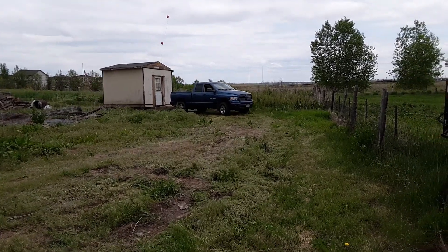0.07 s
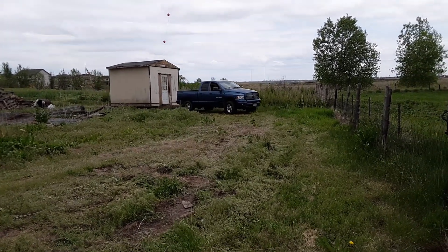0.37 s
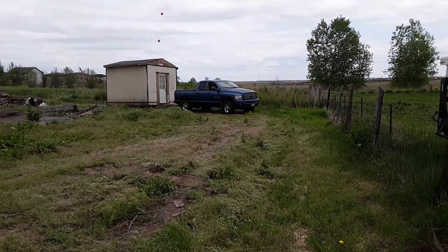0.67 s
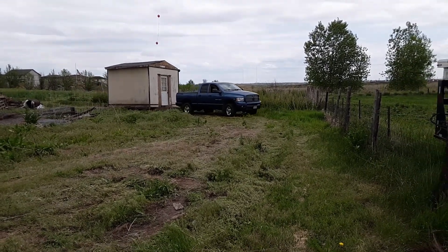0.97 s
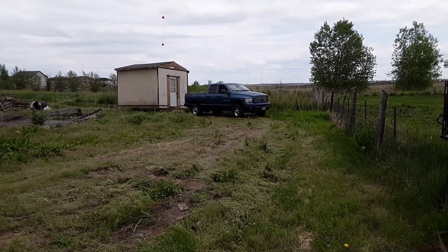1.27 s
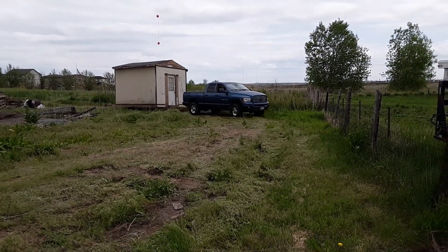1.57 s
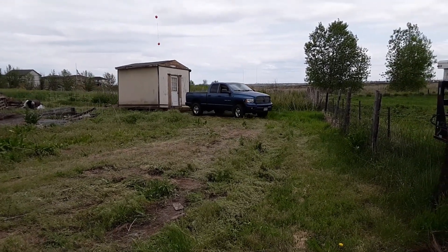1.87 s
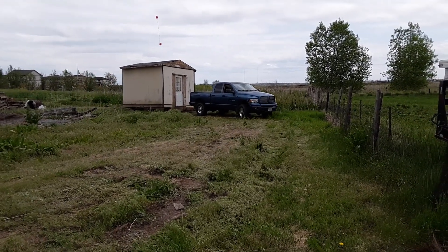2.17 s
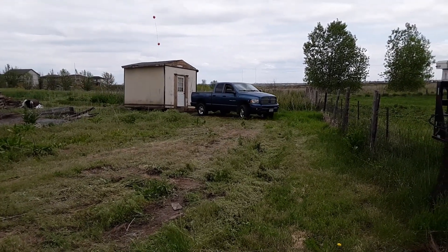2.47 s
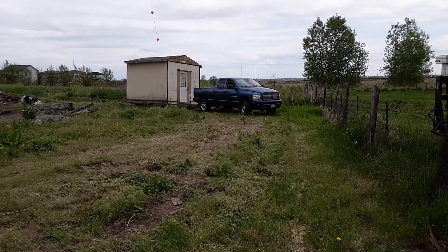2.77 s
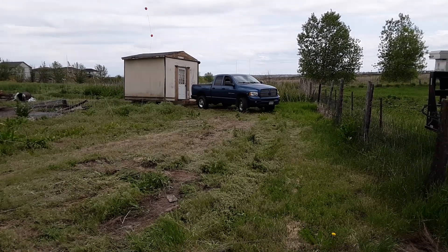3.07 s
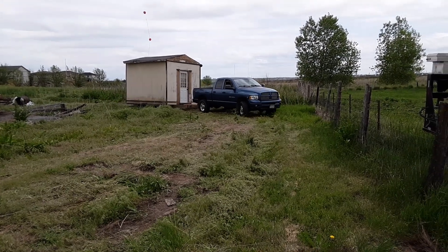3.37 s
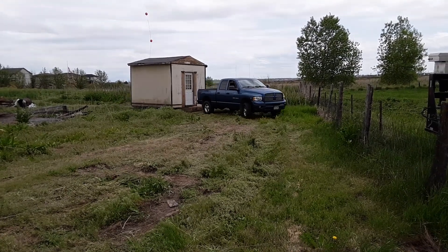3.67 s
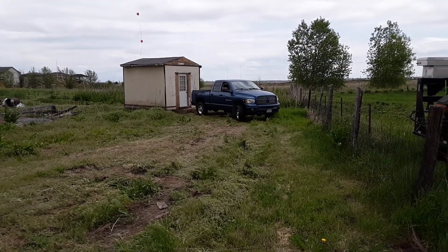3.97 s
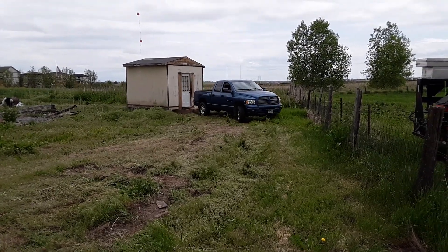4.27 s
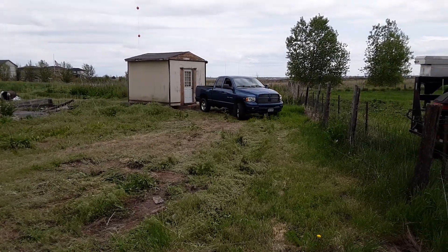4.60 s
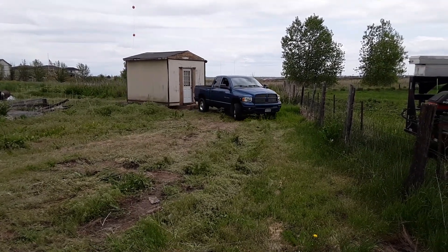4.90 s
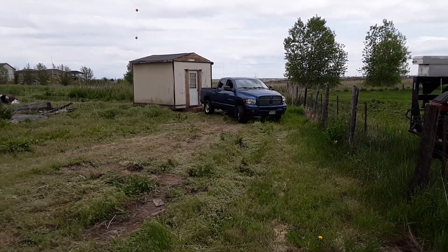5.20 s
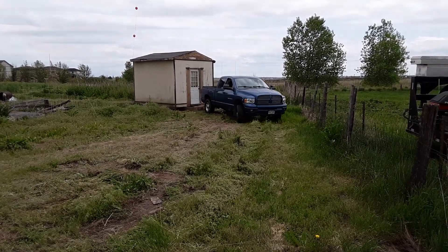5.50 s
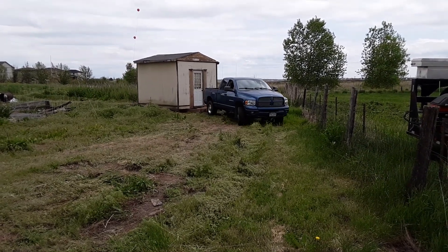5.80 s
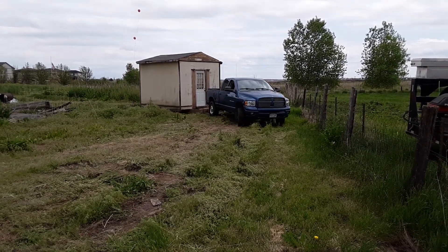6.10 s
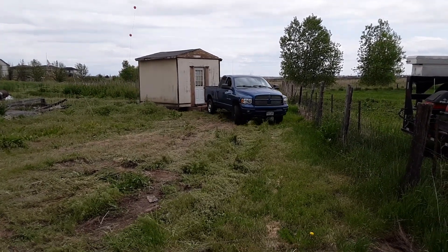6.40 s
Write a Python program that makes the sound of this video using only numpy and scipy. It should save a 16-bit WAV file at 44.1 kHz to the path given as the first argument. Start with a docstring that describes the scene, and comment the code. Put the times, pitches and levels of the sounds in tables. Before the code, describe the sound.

Outdoors, a diesel truck pulls a heavy load at low revs, with a continuous knocking clatter, a deep hum and thin belt squeaks. Quiet footsteps brush through grass and crack a few stems near the microphone. Dull wind buffets come and go, mostly on the muffled right channel. In the second half the engine slows and its boom thins, before swelling again for one last pull.

```python
"""A six-cylinder diesel pickup crawls over a field, dragging a shed: its cylinders clatter unevenly and
its exhaust booms as the load shifts the revs. Close by, feet swish through grass, stalks snap and wind
buffets the microphone. From 1.2 s the truck pulls into the open, its belt chirps and an insect ticks in
faint bouts. The hardest buffets hit near 4.3 s; the revs sag and the boom thins, until the exhaust
growls on a last pull at 6 s. The right microphone port is muffled throughout."""
import sys
import numpy as np
from scipy import signal
from scipy.fft import rfft, irfft
from scipy.io import wavfile
from scipy.ndimage import uniform_filter1d

SR = 44100
rng = np.random.default_rng(int(sys.argv[2]) if len(sys.argv) > 2 else 0)


def materialize(psi):
    """Save the field psi as 16-bit PCM at rate SR to the path in sys.argv[1].

    A 1-D psi becomes a single channel; in a 2-D psi each row is a channel.
    """
    bounded = np.clip(np.atleast_2d(psi).T, -1, 1)
    quanta = np.round(bounded * 32767).astype(np.int16)
    wavfile.write(sys.argv[1], SR, quanta)


N = 293265
TIME = np.arange(N) / SR
FREQS = np.fft.rfftfreq(N, 1 / SR)
CYLINDERS, CRUISE_HZ = 6, 55  # firings per engine cycle; firings per second at cruise


def amp(db):
    """Decibels to gain."""
    return 10 ** (np.asarray(db) / 20)


def unit(x):
    """Scales to rms 1."""
    return x / np.sqrt(np.mean(x ** 2) + 1e-20)


def curve(points):
    """An automation curve through (time_s, value) points."""
    return np.interp(TIME, *np.transpose(points))


def colour(points):
    """An EQ curve through (freq_hz, gain_db) points."""
    hz, db = np.transpose(points)
    return amp(np.interp(np.log(FREQS + 1), np.log(hz + 1), db))


def noise(gain):
    """Noise of rms 1 with the given spectrum."""
    return unit(irfft(rfft(rng.standard_normal(N)) * gain, N))


def drift(hz):
    """A random wobble of rms 1, up to about hz."""
    return noise(1 / (1 + (FREQS / hz) ** 4))


def add(mix, s, sound):
    """Mixes a sound in from time s."""
    part = mix[max(round(s * SR), 0):][:len(sound)]
    part += sound[:len(part)]


def chirps(rows, length_s, glide, rasp, gain_db=0):
    """Short rough whistles that rise by the share glide, from rows of time_s, level_db, pitch_hz."""
    out, t = np.zeros(N), np.arange(0, length_s, 1 / SR)
    for s, db, hz in rows:
        jitter = unit(uniform_filter1d(rng.standard_normal(len(t)), size=30))
        pitch = hz * (1 + glide * (t / length_s - .5) + rasp * jitter)
        whistle = np.sin(2 * np.pi * np.cumsum(pitch) / SR)
        add(out, s - length_s / 4, amp(db + gain_db) * np.hanning(len(t)) * whistle)
    return out


def puffs(rows, octaves, gain_db, size=16384):
    """Brief swells of band noise, from rows of time_s, level_db, half_length_s, centre_hz."""
    out, t, f = np.zeros(N), (np.arange(size) - size / 2) / SR, np.fft.rfftfreq(size, 1 / SR)
    for s, db, half_s, hz in rows:
        band = (1 + (np.log2((f + 1) / hz) / octaves) ** 2 / 6) ** -3
        swell = np.exp(-.5 * (t / half_s) ** 2)
        puff = swell * irfft(rfft(rng.standard_normal(size)) * band)
        puff *= np.linalg.norm(swell) / np.linalg.norm(puff)
        add(out, s - size / 2 / SR, amp(db + gain_db) * puff)
    return out


def air(level_db=-69):
    """A faint, bright bed of open-air hiss."""
    # hiss colour: freq_hz, gain_db
    hiss_eq = [(500, -5.5), (7000, -7), (8500, 3.5), (9700, 3), (10500, -0.5), (13000, -9.5),
               (16000, -10.5)]
    return amp(level_db) * noise(colour(hiss_eq))


def insect(gap_s=0.2875, pitch_hz=9300, level_db=-61.5, scatter_db=5):
    """An insect gives thin, evenly spaced ticks in short bouts."""
    # bouts of ticking: start_s, end_s
    bouts = [(1.26, 1.4), (3.655, 4.1), (5.095, 6.4)]
    times = np.concatenate([np.arange(start, end, gap_s) for start, end in bouts])
    ticks = [(s, rng.normal(level_db, scatter_db), pitch_hz * rng.normal(1, .012)) for s in times]
    return chirps(ticks, length_s=.035, glide=0.036, rasp=0.024)


def grass(stir_db=-87, gain_db=7, grain_db=3, crackles_per_s=80):
    """Blades brush in a clumped fizz with dry crackles, swelling over a faint stir as each foot sweeps."""
    # rustle colour: freq_hz, gain_db
    rustle_eq = [(2000, -22.5), (5000, -11), (8000, -9.5), (10500, -1.5), (13000, -.5), (15500, -3.5)]
    # foot sweeps: peak_s, relative_db, length_s
    swishes = [(0.071, -57.5, .06), (0.227, -61.5, 0.11), (0.457, -54.5, 0.09), (1.0, -65, 0.13),
               (1.16, -65, 0.24), (1.621, -56, .16), (1.852, -57.5, .22), (2.08, -60, .13),
               (2.537, -54.5, .14), (2.797, -68, 0.19), (3.25, -58, 0.25), (3.503, -63.5, 0.12),
               (4.15, -74.5, .3), (4.449, -59.5, 0.12), (4.74, -60, .17), (5.0, -75, .2),
               (5.45, -71.5, 0.12)]
    power = amp(stir_db) ** 2
    for s, db, length in swishes:
        age = (TIME - s) / length
        swell = np.exp(-np.maximum(-age / 0.55, age / 0.63) ** 1.1)  # pointed top, slightly slower fall
        power += (amp(db) * swell) ** 2
    fizz = unit(rng.standard_normal(N) * amp(grain_db * drift(900)))
    onsets = rng.random(N) < crackles_per_s / SR
    crackles = onsets * amp(14 + 5 * np.minimum(rng.exponential(1, N), 3))
    rustle = unit(irfft(rfft(fizz + crackles) * colour(rustle_eq), N))
    return amp(gain_db) * np.sqrt(power) * rustle


def crunches(centre_hz=4700):
    """Dry stems crush underfoot in narrow puffs of noise."""
    # crushed stems: time_s, relative_db, half_length_s
    stems = [(.205, -41.5, 0.0074), (1.613, -41.5, 0.0055), (1.679, -49.5, 0.11), (3.135, -42, 0.016),
             (3.233, -48, 0.062)]
    return puffs([(*row, centre_hz) for row in stems], octaves=0.21, gain_db=-1.5)


def snaps(decay_s=0.00069, octaves=0.61, gain_db=0.5, size=1024):
    """A dry stalk breaks with one sharp crack and a millisecond of splintering."""
    # breaking stalks: time_s, relative_db, centre_hz
    stalks = [(.197, -25, 13000), (.207, -21.5, 10000), (0.282, -31, 8000), (1.576, -25.5, 13100),
              (1.6142, -16, 2700), (1.6148, -24.5, 9550), (1.725, -24, 12000), (1.799, -21.5, 12950),
              (1.8496, -8.5, 14500), (2.476, -23, 13000), (2.611, -28, 11000), (3.238, -16, 14000),
              (4.46, -29, 12900), (4.738, -27, 14000)]
    out, t, f = np.zeros(N), np.arange(size) / SR, np.fft.rfftfreq(2 * size, 1 / SR)
    for s, db, hz in stalks:
        splinters = 0.18 * rng.standard_normal(size) * np.exp(-t / decay_s)
        burst = np.pad((t == 0) + splinters, (size, 0))
        band = np.exp(-.5 * (np.log2((f + 1) / hz) / octaves) ** 2)
        crack = irfft(rfft(burst) * band)
        add(out, s - size / SR, amp(db + gain_db) * crack / abs(crack).max())
    return out


def buffets(gap_s=0.35, eddy_hz=189):
    """Eddies strike a port as dull thuds of a few cycles: a few strong ones, and small ones at random."""
    # strong eddies: time_s, relative_db, half_length_s, centre_hz
    strong = [(0.669, -26.5, 0.018, 183), (0.746, -22.5, 0.034, 160), (.812, -30, 0.0073, 320),
              (0.82, -24.5, 0.06, 176), (.935, -30.5, 0.0092, 270), (0.988, -25, 0.01, 181),
              (1.553, -28, 0.013, 166), (2.39, -28.5, 0.019, 196), (2.502, -28, 0.012, 170),
              (2.62, -27, 0.016, 200), (2.79, -24.5, 0.0095, 240), (4.262, -21, 0.021, 170),
              (4.337, -18, 0.015, 260), (4.423, -19.5, 0.016, 218), (4.716, -27.5, 0.021, 163),
              (5.341, -29, 0.014, 158)]
    small = [((k + .5 + .5 * late) * gap_s, -36.5 + 4 * strength, 0.017, eddy_hz)
             for k, (late, strength) in enumerate(rng.uniform(-1, 1, size=(24, 2)))]
    return puffs(strong + small, octaves=0.4, gain_db=-0.8)


def wind(breeze_db, lumps_db=4.5, rumble_db=-58):
    """Lumpy turbulence over a deep rumble at one microphone port."""
    # turbulence colour: freq_hz, gain_db
    breeze_eq = [(20, -21), (40, -6.5), (75, 4), (130, 0), (220, -5.5), (320, -11), (500, -25), (900, -38),
                 (2000, -58)]
    rumble = noise(colour([(15, -18), (30, -6.5), (45, -6), (90, -11.5), (300, -63)]))
    turbulence = unit(noise(colour(breeze_eq)) * amp(lumps_db * drift(15)))
    return amp(rumble_db) * rumble + amp(breeze_db) * turbulence


def ride(rate, gain_db, db_per_hz, near_share):
    """The fader of one engine part: it rides the firing rate and the truck's nearness."""
    # the truck pulls into the open: time_s, gain_db
    nearness = [(0.0, -2.5), (1.15, -2.5), (1.6, -0.86), (2.5, 0.1), (6.65, 0.5)]
    return amp(gain_db + db_per_hz * (rate - CRUISE_HZ) + near_share * curve(nearness))


def on_crank(firings, every, offset, db, scatter_db, hz, spread):
    """Rows of time_s, level_db, pitch_hz for a sound that returns every few firings."""
    times = TIME[1:][np.diff((firings + offset) // every) > 0]
    accent, detune = rng.standard_normal((len(times), 2)).T
    return np.transpose([times, db + scatter_db * accent, hz * (1 + spread * detune)])


def belt(firings, rate, pitch_hz=3190, pitch_per_rate=32):
    """The belt squeaks faintly once a cycle; its occasional louder chirps are higher at higher revs."""
    # louder chirps: time_s, relative_db
    accents = [(1.537, -43), (1.743, -37.5), (2.05, -38.5), (2.4668, -46), (3.745, -44.5), (4.5226, -46),
               (4.8662, -42)]
    squeaks = on_crank(firings, every=CYLINDERS, offset=0.98, db=-47.5, scatter_db=1, hz=3175,
                       spread=0.045)
    pitch = pitch_hz + pitch_per_rate * (rate - CRUISE_HZ)
    loud = [(s, db, np.interp(s, TIME, pitch)) for s, db in accents]
    return chirps([*squeaks, *loud], length_s=.016, glide=0.083, rasp=0.019, gain_db=6.5)


def crank_ticks(firings, rate):
    """A bright metal tick at each turn of the crank."""
    ticks = on_crank(firings, every=3, offset=1.8, db=-36.5, scatter_db=2, hz=2180, spread=.04)
    fader = ride(rate, 0.5, db_per_hz=0.3, near_share=1.7)
    return fader * chirps(ticks, length_s=.009, glide=0, rasp=.03)


def knocking(firings, rise_s=0.0021, ring_s=0.0042, scatter_db=0.9, gears=0.35, valve=0.55):
    """Force on the block: each firing knocks and a valve shuts midway to the next, over steady gears."""
    # each cylinder's knock, in firing order: relative_db
    knocks = [-8, -3, -3, -14, -3.5, -8.5]
    count = firings.astype(int)
    strength = amp(np.array(knocks)[count % CYLINDERS] + scatter_db * rng.standard_normal(1000)[count])
    since_s = (np.array([firings, firings + .5]) % 1) / np.gradient(firings) / SR
    knock, tap = np.exp(-since_s / ring_s) * (1 - np.exp(-since_s / rise_s))
    return np.sqrt(gears + strength ** 2 * (2 * knock + valve * tap))


def sheet_ring(force, rate):
    """A close pair of sheet-metal modes, kept singing by the knocks."""
    modes = [(1225.7, 67, -1.0), (1159, 140, -2.5)]  # pitch_hz, width_hz, gain_db
    response = sum(amp(db) / (1 + 2j * (FREQS - hz) / width) ** 2 for hz, width, db in modes)
    ring = unit(irfft(rfft(force ** 2 * rng.standard_normal(N)) * response, N))
    return ride(rate, -46.5, db_per_hz=-0.55, near_share=1.7) * ring


def clatter(force, rate, patchy_db=1.37):
    """Knocks shake the block, each band a little differently every time; gives direct and scattered."""
    # engine block colour: freq_hz, gain_db
    block_eq = [(240, -26), (400, -4.5), (441, -6.5), (600, -9), (670, -6), (888, -5.5), (1030, -6),
                (1210, 0), (1360, -3.5), (2020, -1), (2850, -6.5), (3300, -8.5), (3590, -9.5), (5260, -12),
                (7500, -37.5), (9750, -63), (16500, -120)]
    # ringing engine panels: pitch_hz, width_hz, lift_db
    panels = [(671, 55, 4.5), (780, 19, 3.5), (1260, 200, 0), (1530, 50, 4), (1733, 23, 4.5),
              (1930, 100, 2), (3050, 90, -0.5), (5400, 540, 0)]
    lift_db = sum(db / (1 + (2 * (FREQS - hz) / width) ** 2) for hz, width, db in panels)
    body = colour(block_eq) * amp(lift_db)
    band = np.digitize(FREQS, [1000, 1600, 2400, 3400, 4600])
    spectra = 0
    for k in np.unique(band):
        blows = force * amp(patchy_db * drift(82)) * rng.standard_normal((2, N))
        spectra += rfft(blows) * body * (band == k)
    return ride(rate, -38, db_per_hz=0.17, near_share=0.36) * unit(irfft(spectra, N))


def roar(level_db=-41):
    """A steady low roar beneath the engine's tones."""
    # roar colour: freq_hz, gain_db
    roar_eq = [(20, -17.5), (45, -6.5), (90, 11.5), (230, -1.5), (330, -4.5), (480, -8), (620, -19.5),
               (1200, -44)]
    return amp(level_db) * noise(colour(roar_eq))


def pipe(hz, centre_hz, width_hz):
    """Gain of an exhaust pipe resonance for a tone at hz."""
    return 1 / (1 + (2 * (hz - centre_hz) / width_hz) ** 2)


def partials(rows, phase, waver, waver_hz):
    """Wavering harmonics of the whole engine cycle, locked to the firing phase."""
    return sum(amp(db) * (1 + waver * drift(waver_hz))
               * np.sin(order * phase / CYLINDERS + 2 * np.pi * rng.random()) for order, db in rows)


def exhaust(firings, rate, throb=0.052, growl_gain_db=1.5):
    """Clean tones boom as the revs pass the pipe's resonances; unequal cylinders add tones between."""
    # weaker exhaust tones: cycle_multiple, level_db
    uneven_tones = [(8, -65.5), (9, -54.5), (10, -52.5), (13, -60), (14, -47.5), (15, -43), (16, -50.5),
                    (18, -46.5), (21, -62), (22, -58), (27, -58.5), (32, -53.5), (44, -66.5)]
    # growl under throttle: cycle_multiple, relative_db
    growl_tones = [(25, -13), (26, -25.5), (33, -19.5), (36, -14.5), (39, -17), (42, -24.5), (48, -16.5),
                   (51, -22.5), (54, -19.5), (60, -24.5), (78, -19), (84, -17.5)]
    # the exhaust opens up on the last pull: time_s, relative_db
    growl_swell = [(0.0, -45), (3.4, -45.5), (5.7, -47.5), (6.15, -36.5), (6.65, -40.5)]
    phase = 2 * np.pi * firings
    bass = ride(rate, -44, db_per_hz=0.7, near_share=-0.3) * np.sin(phase)
    boom = ride(rate, -20.5, db_per_hz=0.49, near_share=1) * np.sin(2 * phase)
    boom *= pipe(2 * rate, centre_hz=114.36, width_hz=9.74) * (1 + throb * drift(5.7))
    octave = ride(rate, -38.5, db_per_hz=0, near_share=1.3) * np.sin(4 * phase)
    octave *= pipe(4 * rate, centre_hz=218.5, width_hz=22.5)
    growl = partials(growl_tones, phase, waver=0.27, waver_hz=14)
    growl *= amp(curve(growl_swell) + growl_gain_db)
    uneven = partials(uneven_tones, phase, waver=0.25, waver_hz=1.6)
    return np.sqrt(2) * (bass + boom + octave + growl + uneven)


def scene(alike_hz=2800):
    """Truck and field reach the left port first; the right port hears them dulled and late."""
    # engine speed, sagging whenever the shed digs in: time_s, firing_hz
    revs = [(0.0, 57.9), (0.45, 59.3), (0.75, 57.7), (1.08, 55.1), (1.55, 57.7), (1.95, 58.7), (2.5, 57.2),
            (3.47, 56.3), (3.71, 53.1), (3.88, 54.2), (4.15, 55.3), (4.48, 54.2), (4.72, 51.0), (5.1, 51.6),
            (5.75, 51.4), (6.2, 56.6), (6.4, 55.3), (6.65, 53.0)]
    # muffling of the right port: freq_hz, gain_db
    muffle_eq = [(60, 2), (115, -1.5), (250, -5), (400, -10), (700, -14), (1250, -17), (1600, -23),
                 (2000, -21.5), (2900, -29.5), (3700, -23.5), (5000, -37.5), (8000, -25.5), (15000, -29.5)]
    # right port behind the left: freq_hz, lag_rad
    lag = [(0, 0.84), (113, 0.58), (330, 0.9), (1250, 1.6), (2000, 3.7), (3400, 8.1), (5200, 14),
           (16000, 69)]
    rate = curve(revs)
    firings = np.cumsum(rate) / SR
    force = knocking(firings)
    direct, scattered = clatter(force, rate)
    shared = exhaust(firings, rate) + roar() + sheet_ring(force, rate)
    shared += crank_ticks(firings, rate) + belt(firings, rate)
    shared += snaps() + crunches() + insect()
    fade = signal.windows.tukey(N, .001)
    left = shared + direct + grass() + air()
    right_spectrum = rfft(fade * shared + grass() + air())
    alike = 1 / (1 + (FREQS / alike_hz) ** 3)  # short waves differ between the ports
    right_spectrum += alike * rfft(direct) + np.sqrt(1 - alike ** 2) * rfft(scattered)
    delay = np.exp(-1j * np.interp(FREQS, *np.transpose(lag)))
    right = irfft(right_spectrum * colour(muffle_eq) * delay, N)
    left += wind(breeze_db=-45) + amp(-15) * buffets()
    right += wind(breeze_db=-36.5) + buffets()  # this port faces the wind
    return fade * np.array([left, right])


def record(dry, edge_hz=16500):
    """A steep low-pass trims the very top of the treble."""
    lowpass = signal.firwin(511, edge_hz, window=("kaiser", 9), fs=SR)
    return signal.oaconvolve(dry, lowpass[None], "same")


dry = scene()
out = record(dry)
materialize(out)
```